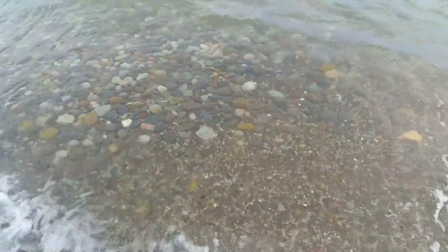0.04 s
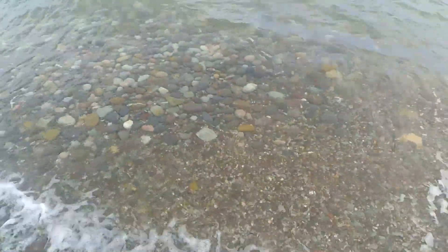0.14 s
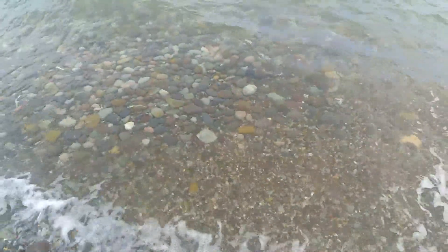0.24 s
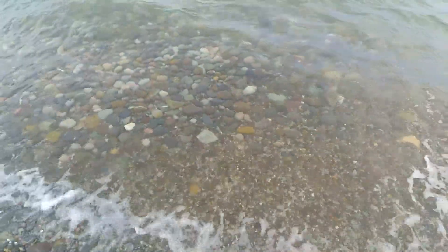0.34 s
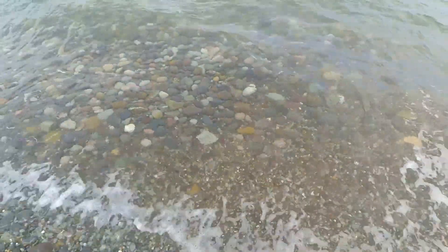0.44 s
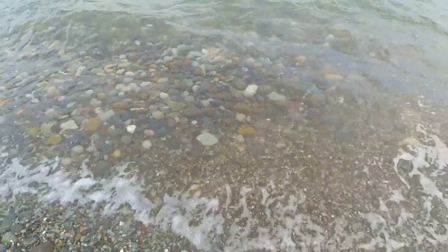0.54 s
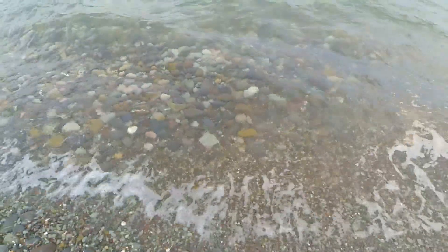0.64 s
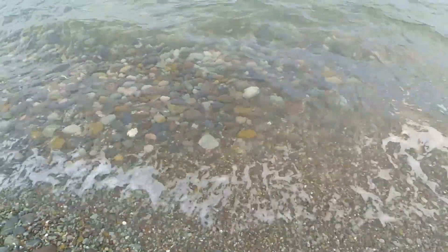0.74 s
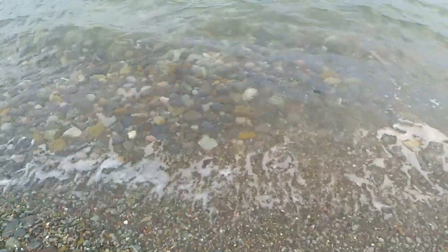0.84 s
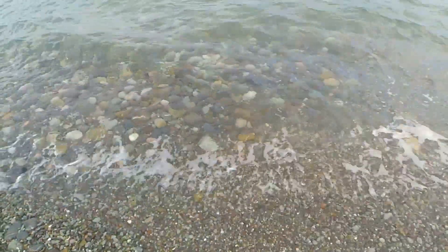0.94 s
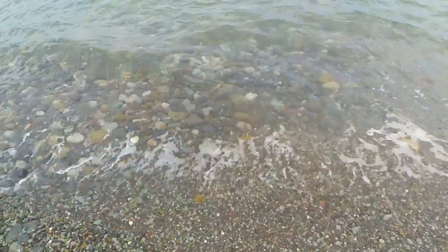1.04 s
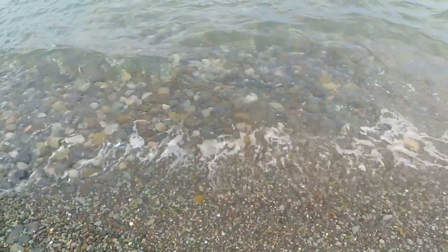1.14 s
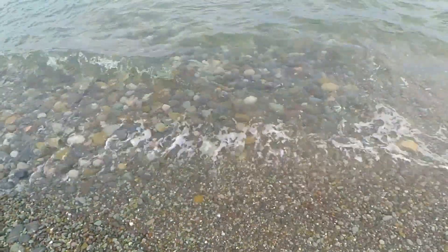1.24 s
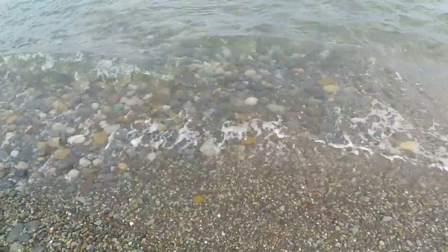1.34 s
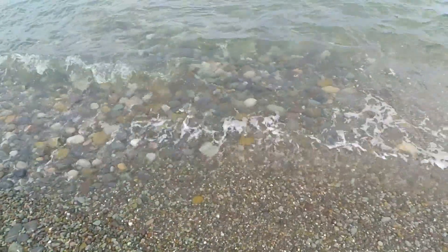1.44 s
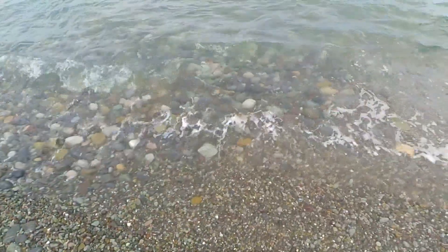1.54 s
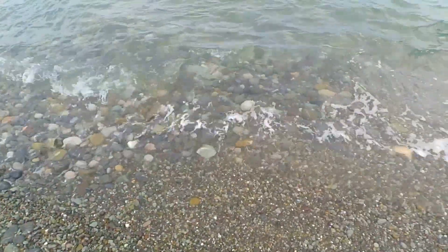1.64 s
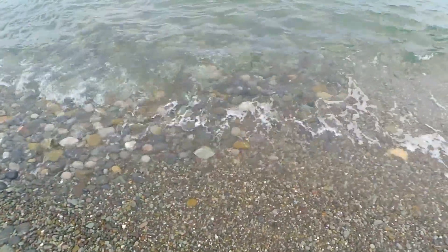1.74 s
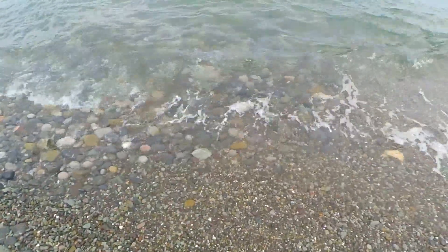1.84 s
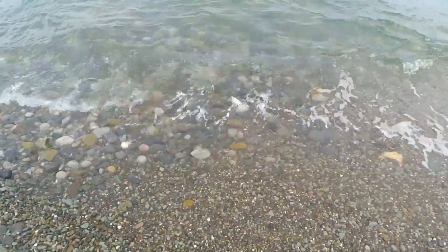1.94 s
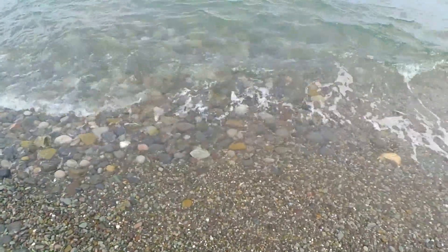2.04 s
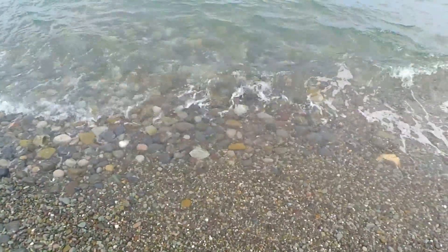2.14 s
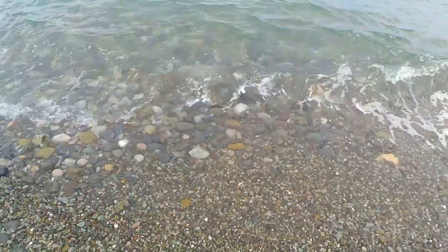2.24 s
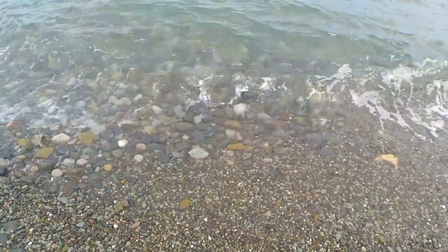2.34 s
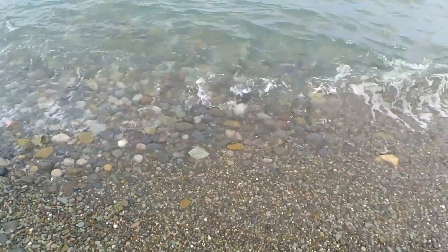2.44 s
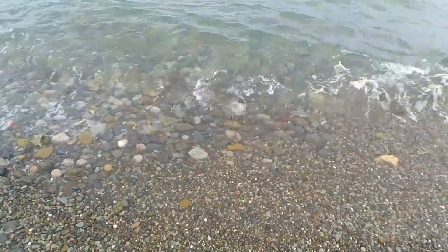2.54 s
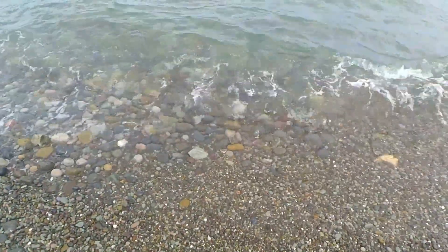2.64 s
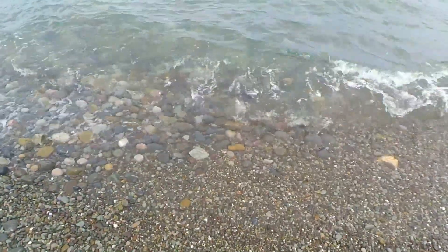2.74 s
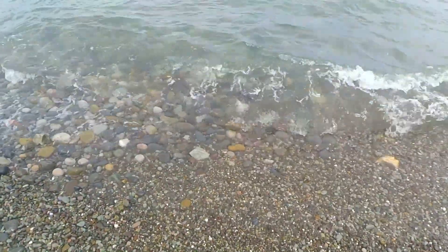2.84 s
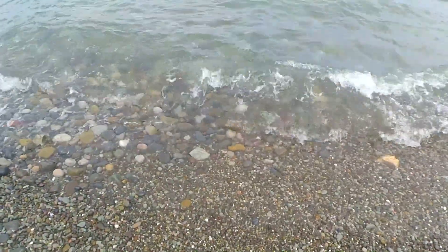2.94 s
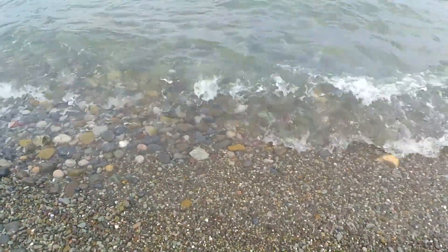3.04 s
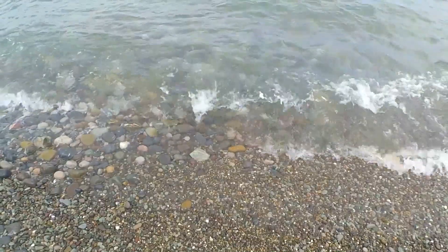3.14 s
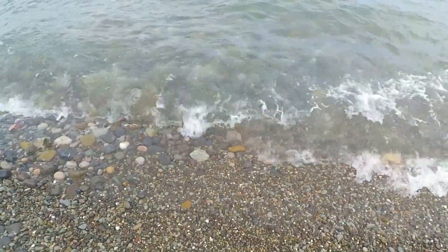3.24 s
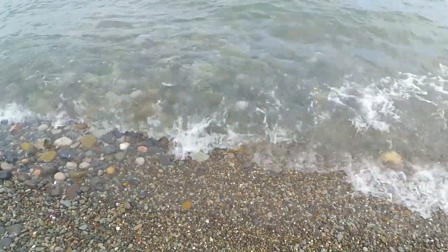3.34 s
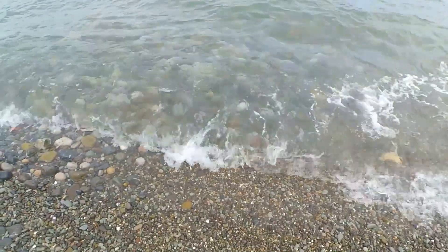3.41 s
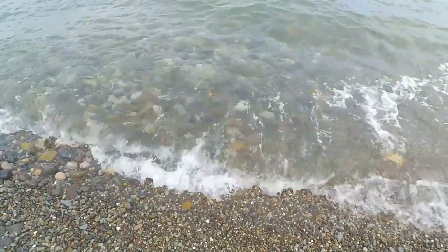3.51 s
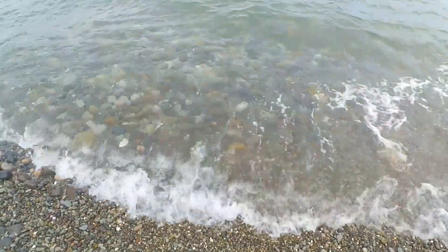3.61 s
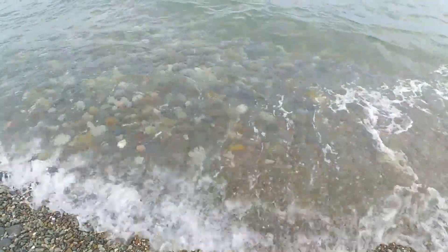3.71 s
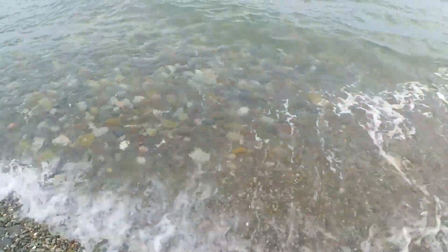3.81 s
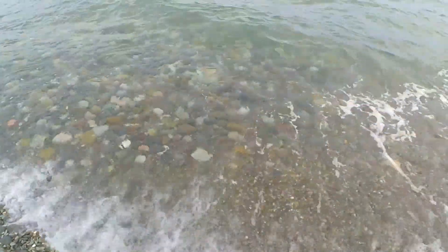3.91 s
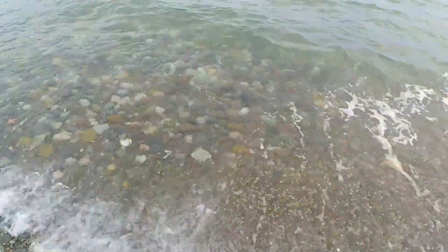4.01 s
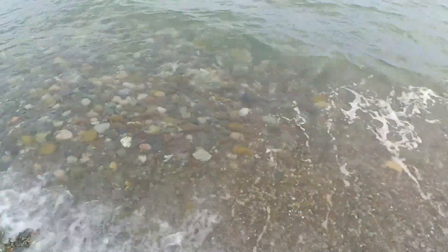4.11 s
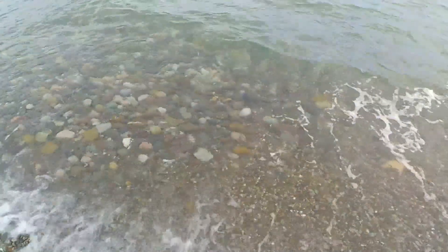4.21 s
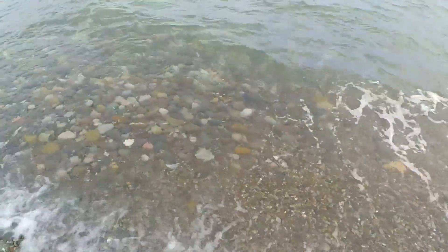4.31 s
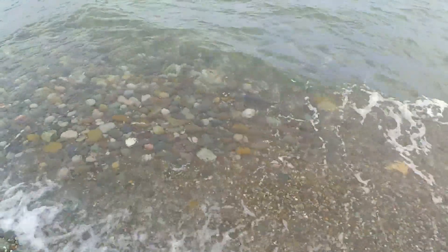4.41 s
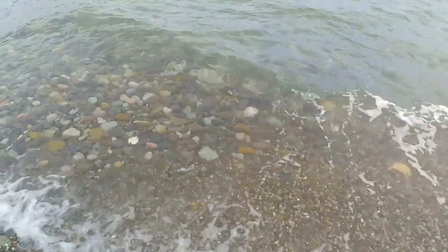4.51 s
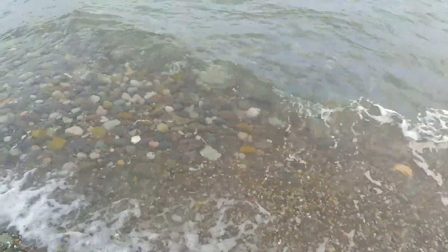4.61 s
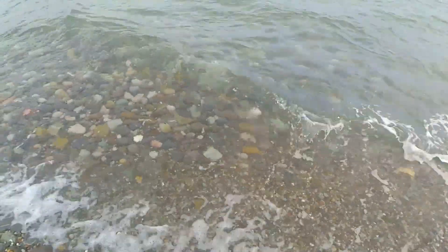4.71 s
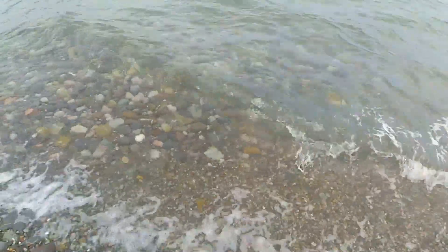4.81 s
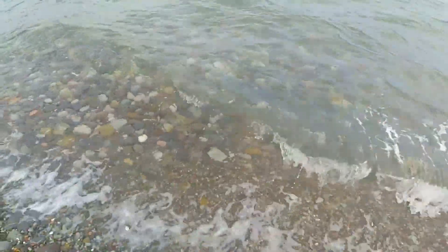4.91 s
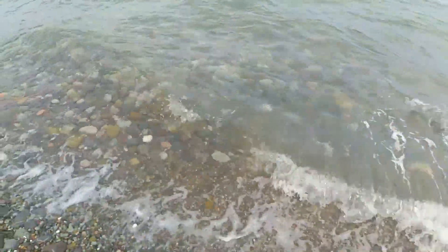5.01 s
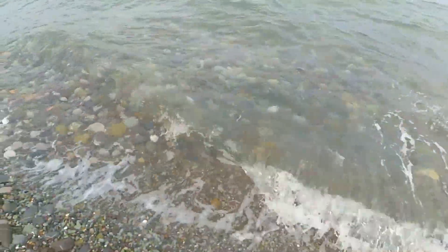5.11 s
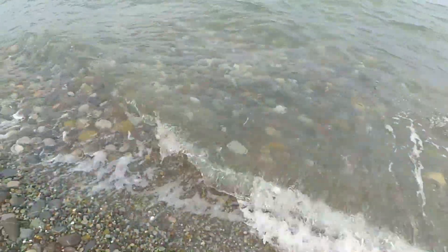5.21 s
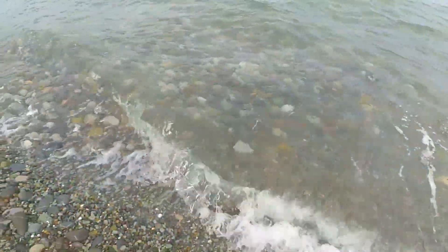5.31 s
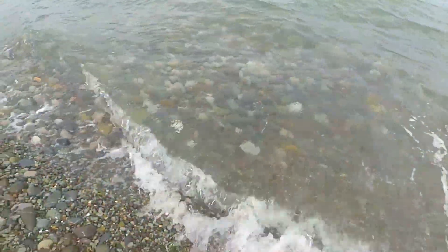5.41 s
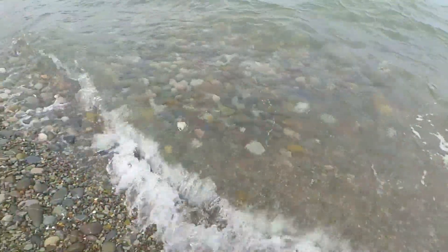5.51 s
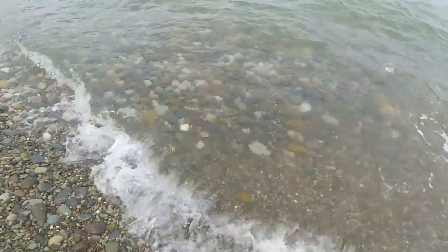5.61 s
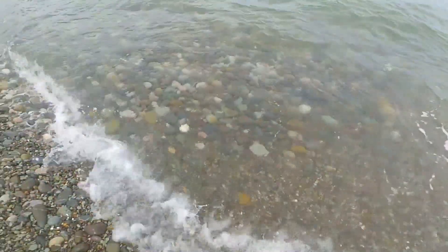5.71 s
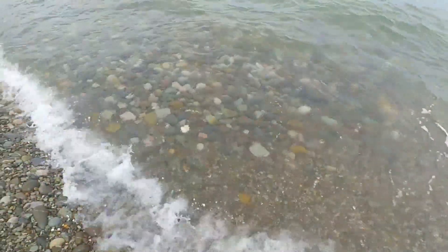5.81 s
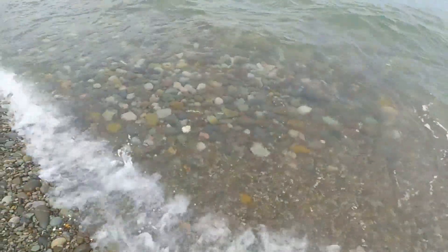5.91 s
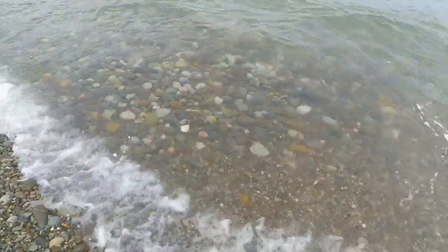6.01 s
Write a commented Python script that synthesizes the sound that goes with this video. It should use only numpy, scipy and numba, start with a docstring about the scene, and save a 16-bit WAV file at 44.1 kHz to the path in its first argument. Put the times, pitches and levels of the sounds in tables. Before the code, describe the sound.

Outdoors by the water, heard through one wind-exposed microphone: fizzing foam and draining water first, with fine gravel rattling and a few sharper pebble knocks. After a small lap and a quieter spell, two stronger waves roll in, churning low and hissing bright, with splashes and hollow trapped-air plops. Deep wind buffeting comes and goes, including one abrupt clipped thud before the first large wave.

```python
"""Spent foam fizzes and drains through the stones of a pebble beach, heard at the water's edge in gusty wind.
A ripple laps, then two waves roll over, gurgle and rush up the shingle past a mono microphone.
The water is clouds of ringing bubbles and stone ticks over filtered noise; pebbles and splashes are short
noise showers, and trapped air rings as damped sines. Low noise in gusts buffets the microphone,
and one hard eddy overloads it for an instant."""
import sys
import numpy as np
from scipy import signal
from scipy.fft import rfft, irfft
from scipy.io import wavfile
from scipy.ndimage import uniform_filter1d, map_coordinates
from numba import njit

SR = 44100
rng = np.random.default_rng(int(sys.argv[2]) if len(sys.argv) > 2 else 0)


def int16_out(signal):
    """Quantize to a 16-bit WAV file."""
    q = np.round(np.clip(np.atleast_2d(signal).T, -1, 1) * 32767)
    wavfile.write(sys.argv[1], SR, q.astype(np.int16))


N = 267246


def undb(db):
    """Decibels to gain."""
    return 10 ** (np.asarray(db) / 20)


def unit(x):
    """Scale to rms 1."""
    return x / np.sqrt(np.mean(x ** 2) + 1e-18)


def colour(x, spectrum):
    """Filter by a (frequency [Hz], gain [dB]) spectrum, with -80 dB beyond its ends; rms 1."""
    hz, db = np.transpose(spectrum)
    log_hz = np.log(np.arange(N // 2 + 1) * SR / N + .01)
    gain = undb(np.interp(log_hz, np.log(hz), db, left=-80, right=-80))
    return unit(irfft(rfft(x) * gain, N))


def walk(rate):
    """Smooth random wander through `rate` random points a second."""
    points = rng.standard_normal(4096)
    return map_coordinates(points, [np.arange(N) / SR * rate], order=3, mode="wrap")


@njit
def ring(start, hz, t60, size, rise):
    """Sum of damped sines whose pitch climbs by the share `rise` while they die by 60 dB."""
    out = np.zeros(N)
    for k in range(len(start)):
        first = int(start[k] * SR)
        length = int(t60[k] * SR) + 2
        turn = 2 * np.pi * hz[k] / SR
        z = size[k] + 0j
        step = np.exp(1j * turn - np.log(1000) / length)
        glide = np.exp(1j * turn * rise / length)
        for i in range(first, min(first + length, N)):
            z *= step
            step *= glide
            out[i] += z.imag
    return out


def cloud(low_hz, high_hz, cycles, spread_db, rise, count):
    """Bubbles or stone ticks at random moments and pitches: many faint, a few strong."""
    when, pitch, strength, life = rng.random((count, 4)).T
    hz = np.minimum(low_hz * (high_hz / low_hz) ** pitch, SR / 2.6)
    rank = -np.log(strength + .01)
    # small ones ring briefly, so they need more swing for the same energy per Hz
    size = undb(spread_db * rank) * hz
    t60 = cycles * (.5 + life) / hz
    return unit(ring(when * N / SR, hz, t60, size, float(rise)))


def water(grains, spectrum, blur_db, flicker_db, flicker_rate):
    """Near grains over the blur of countless far ones, arriving in uneven spurts."""
    near = colour(grains, spectrum)
    far = colour(rng.standard_normal(N), spectrum)
    flicker = undb(flicker_db * walk(flicker_rate))
    return unit((near + undb(blur_db) * far) * flicker)


def swell(level_db, climb_db, growth_db_per_s, fall_db_per_s, calm_db):
    """Level in dB of one part of the water: each wave builds, breaks, runs up the beach and dies away."""
    # the waves: (breaks at [s], strength [dB], build-up [s], run up the beach [s])
    waves = [(1.41, -10, .12, 0.051), (3.72, -0.57, 1.37, 0.28), (5.30, 0.02, .30, 0.47)]
    t = np.arange(N) / SR
    power = undb(calm_db) ** 2
    for s, db, build, run in waves:
        before = climb_db * np.maximum(s - t, 0) / build
        during = growth_db_per_s * np.clip(t - s, 0, run)
        after = fall_db_per_s * np.maximum(t - s - run, 0)
        power = power + undb(level_db + db - before + during - after) ** 2
    return 10 * np.log10(power)


def soak():
    """The spent wave's foam sinks into the gravel with a fine sizzle of small ringing bubbles."""
    # the sizzle dying into the gravel: (time [s], level [dB])
    fade = [(0, -38.5), (.1, -37.5), (.22, -33), (.42, -35.5), (.6, -41), (.9, -74), (1.2, -89.5)]
    # its colour: (frequency [Hz], level [dB per Hz])
    tone = [(1000, -4), (1600, -7.5), (2200, -6), (2900, -6.5), (4000, -9.5), (7000, -7)]
    s, db = np.transpose(fade)
    bubbles = cloud(1305, 4900, cycles=28, spread_db=1.5, rise=0.11, count=12000)
    return colour(bubbles, tone) * undb(np.interp(np.arange(N) / SR, s, db))


def drain():
    """The spent wave drains through the shingle, setting in quickly and thinning slowly; 1 at its fullest."""
    fullest_s, rise_db_per_s, fall_db_per_s = 0.34, 16, 5
    t = np.arange(N) / SR - fullest_s
    return undb(-rise_db_per_s * np.maximum(-t, 0) - fall_db_per_s * np.maximum(t, 0))


def rattle():
    """The backwash rolls fine gravel, whose stones tick against each other in uneven runs."""
    # colour of the ticks: (frequency [Hz], level [dB per Hz])
    spectrum = [(1500, -14), (3000, -4), (5000, 4), (8000, -6), (15000, -30)]
    level_db, wander_db = -45.5, 4.0
    ticks = cloud(2140, 14500, cycles=9.9, spread_db=3.0, rise=0, count=2500)
    return colour(ticks, spectrum) * undb(level_db + wander_db * walk(13.9)) * drain()


def edge():
    """Foam bubbles burst and pebbles tick at the water's edge, in the waves and in the backwash."""
    # colours of foam and spray: (frequency [Hz], level [dB per Hz])
    foam_tone = [(700, -25), (1500, -2), (2300, -1.5), (3200, 2), (4600, -0.5), (6300, -5.5), (9000, -18.5),
                 (15000, -16.5)]
    spray_tone = [(3000, -32), (5500, -2), (7200, -0.5), (9000, -3.5), (11500, -10), (15000, -18)]
    # how each follows a wave: (level at the break [dB], climb over the build-up [dB],
    # growth on the run-up [dB/s], fall [dB/s], level between waves [dB])
    foam_swell = (-32.5, 6.5, 6, 39, -49)
    spray_swell = (-38, 8, 0.5, 45, -58)
    drain_foam_db, drain_spray_db = -37, -45  # at the fullest of the backwash
    bubbles = cloud(1360, 9440, cycles=11.6, spread_db=1.5, rise=.05, count=22000)
    ticks = cloud(4400, 18000, cycles=8.9, spread_db=3.5, rise=0, count=16000)
    foam = water(bubbles, foam_tone, blur_db=-2.5, flicker_db=1.0, flicker_rate=50)
    spray = water(ticks, spray_tone, blur_db=0.0, flicker_db=1.0, flicker_rate=92)
    backwash = drain()
    foam_level = np.hypot(undb(swell(*foam_swell)), undb(drain_foam_db) * backwash)
    spray_level = np.hypot(undb(swell(*spray_swell)), undb(drain_spray_db) * backwash)
    # the hiss is slightly uneven, less so where the backwash is full
    spurts = undb((0.16 - 0.1 * backwash) * walk(110))
    return spurts * (foam * foam_level + spray * spray_level)


def churn():
    """Big bubbles gurgle low under the crest, each gliding up in pitch as it dies."""
    # colour: (frequency [Hz], level [dB per Hz])
    spectrum = [(70, -22), (150, -2.5), (240, -0.5), (340, -1.5), (480, -2), (650, -3.5), (1000, -12),
                (2500, -32)]
    # (level at the break [dB], climb over the build-up [dB], growth on the run-up [dB/s],
    # fall [dB/s], level between waves [dB])
    follow = (-30, 8, 1, 26, -44.5)
    bubbles = cloud(130.7, 1080, cycles=11.7, spread_db=2.0, rise=0.17, count=4500)
    return water(bubbles, spectrum, blur_db=-5, flicker_db=0.4, flicker_rate=17) * undb(swell(*follow))


def crest():
    """Smaller bubbles rush in the crest: higher pitches, packed more densely."""
    # colour: (frequency [Hz], level [dB per Hz])
    spectrum = [(250, -17), (500, -6), (800, 0), (1200, 0), (1800, -3), (2600, -7.5), (4500, -24),
                (10000, -63)]
    # (level at the break [dB], climb over the build-up [dB], growth on the run-up [dB/s],
    # fall [dB/s], level between waves [dB])
    follow = (-26.5, 11, 4.5, 30.5, -42)
    bubbles = cloud(451.5, 3476, cycles=21, spread_db=1.4, rise=0.24, count=12000)
    return water(bubbles, spectrum, blur_db=-3.0, flicker_db=0.05, flicker_rate=25) * undb(swell(*follow))


def steadied(x, span):
    """Even out the slow swell of a noise over `span` seconds."""
    return x / np.sqrt(uniform_filter1d(x ** 2, int(span * SR)) + 1e-3)


def gusts():
    """Strength of the buffeting and of the flutter: bell-shaped gusts over a light breeze."""
    # gusts: (strongest at [s], relative buffeting [dB], relative flutter [dB], half-length [s])
    blows = [(.04, -24.5, -39, 0.21), (1.037, -23.5, -45.5, 0.12), (1.584, -18.5, -45.5, 0.21),
             (2.914, -10.5, -23.5, 0.13), (3.192, -15, -45, 0.16), (3.838, -22, -33, 0.21),
             (4.39, -16.5, -34, .11), (5.012, -12, -26, 0.25), (5.38, -15.5, -29, 0.27),
             (5.876, -23, -32.5, 0.12)]
    breeze_db, breeze_flutter_db = -33, -48  # between the gusts, on the same relative scales
    t = np.arange(N) / SR
    power = undb([[breeze_db], [breeze_flutter_db]]) ** 2
    for s, buffet_db, flutter_db, half in blows:
        power = power + undb([[buffet_db], [flutter_db]]) ** 2 * np.exp(-((t - s) / half) ** 2)
    return np.sqrt(power)


def wind():
    """Slow pressure swings on the microphone port, faster flutter in the gusts, and one hard eddy."""
    # colours of the swings and the flutter: (frequency [Hz], level [dB per Hz])
    buffet_tone = [(2, -10), (8, 0.5), (20, 3), (30, -3.5), (55, -10.5), (75, -23.5), (110, -38),
                   (300, -66)]
    flutter_tone = [(35, 3), (62, 4.5), (90, -2), (130, -4.5), (180, -19), (300, -31), (900, -36)]
    # the strongest eddy: (time [s], half-length [s], pressure [dB re full scale])
    strongest = (2.9865, 0.0098, 4.2)
    push, shake = gusts()
    buffet = steadied(colour(rng.standard_normal(N), buffet_tone), 0.214) * push * undb(3.0)
    flutter = steadied(colour(rng.standard_normal(N), flutter_tone), 0.26) * shake
    # the air flutters hardest at the extremes of a swing, in either direction
    flutter *= 0.7 + 0.85 * np.abs(steadied(buffet, 0.3))
    s, half, db = strongest
    eddy = np.exp(-((np.arange(N) / SR - s) / half) ** 2)
    # the eddy's steady pressure takes the place of the other wind
    return (buffet + flutter) * (1 - eddy) + undb(db) * eddy


def shower(s, db, hz, decay):
    """A short, dying shower of tiny impacts: rough noise in a band around one pitch."""
    t = np.arange(SR) / SR
    attack = .3 * decay
    drops = rng.standard_normal(len(t)) * undb(1.6 * rng.standard_normal(len(t)))
    band = signal.butter(2, [hz * 0.47, min(hz * 1.43, SR / 3)], "band", fs=SR, output="sos")
    envelope = np.minimum(t / attack, np.exp((attack - t) / decay))
    burst = unit(signal.sosfilt(band, drops)) * envelope
    first = max(int((s - attack / 2) * SR), 0)
    return np.pad(undb(db) * burst, (first, N))[:N]


def clacks():
    """Pebbles shifted by the draining water rattle briefly against their neighbours."""
    # knocks: (time [s], level [dB])
    knocks = [(0.043, -35.5), (0.533, -22), (.748, -32), (.797, -30), (1.018, -32.5), (1.072, -45),
              (1.164, -28), (1.313, -31), (1.385, -26.5), (1.412, -30), (1.487, -34), (1.661, -32.5),
              (1.828, -33), (1.872, -30.5), (1.896, -30.5), (2.057, -43)]
    pitch_hz, decay_s = 4160, 0.011
    return sum(shower(s, db, pitch_hz, decay_s) for s, db in knocks)


def splashes():
    """Each slap of water tumbling onto the stones throws a shower of droplets."""
    # slaps: (time [s], level [dB], centre [Hz], decay [s])
    slaps = [(.536, -33.5, 800, .03), (.547, -29, 3700, 0.034), (.85, -34.5, 1300, 0.017),
             (2.33, -34, 800, 0.16), (2.60, -31, 320, .15), (3.19, -29.5, 920, 0.12),
             (3.52, -29, 5070, .026), (3.658, -26.5, 4200, 0.036), (3.76, -26, 2940, .17),
             (4.226, -23.5, 1690, 0.0053), (5.27, -30, 1000, 0.045), (5.371, -35, 1400, .016),
             (5.590, -24, 950, 0.015), (5.71, -31, 3620, 0.066), (5.722, -23, 890, 0.02),
             (5.77, -23.5, 278, 0.052)]
    return sum(shower(*row) for row in slaps)


def pockets():
    """Air shut in by the tumbling water rings with a hollow plop, the big low pockets for longest."""
    # pockets: (time [s], starting pitch [Hz], peak level [dB])
    plops = [(.665, 547, -28), (3.228, 234, -26), (3.544, 149, -20.5), (3.573, 625, -18), (3.723, 460, -18),
             (5.274, 263, -18.5), (5.356, 232, -17), (5.416, 207, -17.5), (5.452, 990, -7),
             (5.4523, 455, -9.5), (5.455, 126, -10.5), (5.457, 630, -10), (5.819, 285, -23)]
    cycles = 24.4  # to die by 60 dB
    s, hz, db = np.array(plops, float).T.copy()
    return ring(s, hz, cycles / hz, undb(db), 0.054)


def gurgles():
    """As a gap fills, its air space shrinks and the trickle rings it at an ever higher, unsteady pitch."""
    # gaps between stones: (time [s], length [s], first pitch [Hz], last pitch [Hz], level [dB])
    gaps = [(1.195, .10, 327, 680, -43), (1.478, 0.075, 390, 1354, -42.5), (1.604, 0.067, 322, 540, -49.5)]
    out = np.zeros(N)
    waver, throb = walk(130), walk(110)
    for s, length, first_hz, last_hz, db in gaps:
        span = slice(int(s * SR), int((s + length) * SR))
        filled = np.linspace(0, 1, len(out[span]))
        rising_hz = first_hz * (last_hz / first_hz) ** (filled ** 1.3)
        hz = rising_hz * (1 + 0.056 * waver[span])
        envelope = np.sqrt(filled) * (1 - filled) * undb(4.1 * throb[span])
        tone = np.sin(2 * np.pi * np.cumsum(hz) / SR)
        out[span] += undb(db) * unit(envelope * tone)
    return out


def scene():
    """Sea and wind at one microphone, the same in both channels."""
    surf = edge() + churn() + crest()
    stones = rattle() + clacks()
    mono = soak() + surf + stones + wind() + splashes() + pockets() + gurgles()
    return np.array([mono, mono])


def record(dry):
    """The input clips at full scale, which blanks the sea for an instant; the top is cut."""
    top_hz = 15400
    clipped = np.clip(dry, -1, 1)
    return signal.sosfilt(signal.ellip(10, .1, 80, top_hz, fs=SR, output="sos"), clipped)


dry = scene()
out = record(dry)
int16_out(out)
```